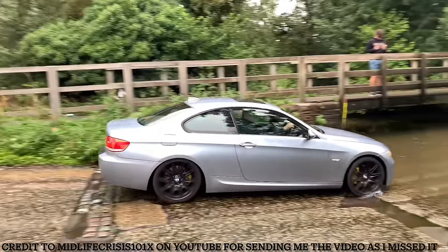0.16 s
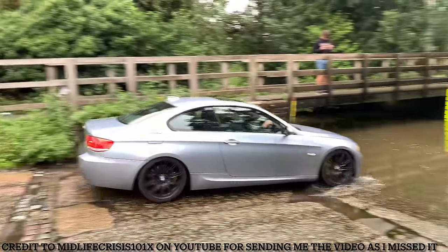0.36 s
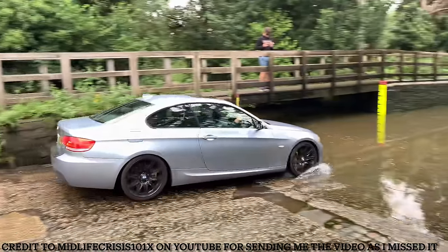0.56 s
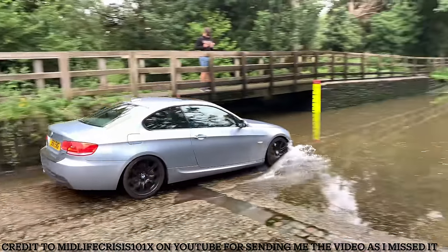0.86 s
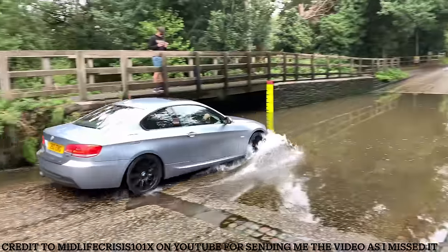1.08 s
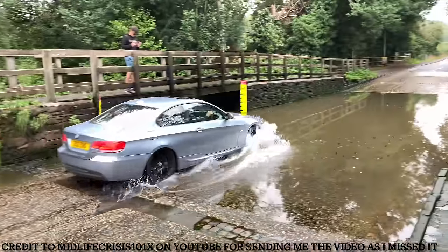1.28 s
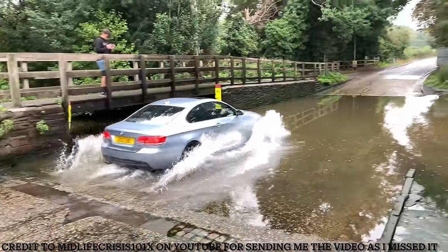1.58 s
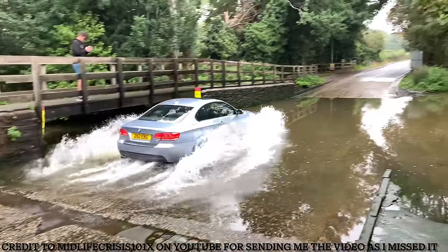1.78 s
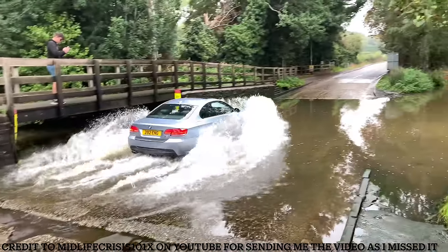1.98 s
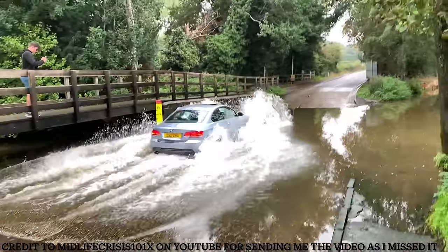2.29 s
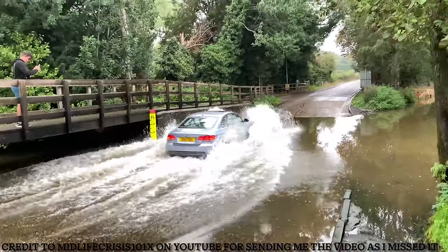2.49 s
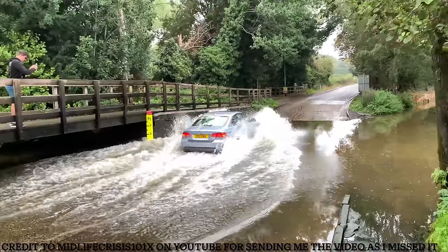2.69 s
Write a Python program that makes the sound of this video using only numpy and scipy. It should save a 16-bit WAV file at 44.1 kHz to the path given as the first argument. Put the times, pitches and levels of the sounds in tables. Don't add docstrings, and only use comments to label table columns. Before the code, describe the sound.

A car drives into a flooded ford. At 0-0.7 s a low engine mutters quietly, with crisp, hollow tyre slaps near 0.13 and 0.43 s and a thin watery hiss. From 0.8 s the splash grows; hard slaps hit at 1.1 and 1.4 s. Rushing spray, gurgling churn and thudding booms then fill the rest, deepest from 2.3 s, still roaring at the end as engine revs rise underneath.

```python
import sys
import numpy as np
from scipy import signal
from scipy.fft import rfft, irfft, next_fast_len
from scipy.io import wavfile
from scipy.ndimage import uniform_filter1d, map_coordinates

SR = 44100
rng = np.random.default_rng(int(sys.argv[2]) if len(sys.argv) > 2 else 0)


def invert_db(x):
    u = np.asarray(x, float) / 20
    return 10 ** u


def int16_out(signal):
    q = np.round(np.clip(np.atleast_2d(signal).T, -1, 1) * 32767)
    wavfile.write(sys.argv[1], SR, q.astype(np.int16))


N = 125685


def unit(x):
    return x / np.sqrt(np.mean(x ** 2) + 1e-20)


def along(points, hz):
    f, value = np.transpose(points)
    return np.interp(np.log(hz + 1), np.log(f + 1), value)


def curves(rows):
    s, *columns = np.transpose(rows)
    return [np.interp(np.arange(N) / SR, s, column) for column in columns]


def wobble(rate_hz):
    return map_coordinates(rng.standard_normal(200), [np.arange(N) * min(rate_hz, 60) / SR])


def filtered(x, response):
    size = next_fast_len(N + 8192)
    return irfft(rfft(x, size) * response(np.fft.rfftfreq(size, 1 / SR)), size)[..., :N]


def evened(x, span_s):
    power = np.abs(uniform_filter1d((x ** 2).mean(0), round(span_s * SR)))
    return x / np.sqrt(power + 1e-3)


# f/Hz, correlation
PORT_LIKENESS = [(60, .997), (200, .985), (500, .76), (1400, .6), (2500, .34), (6500, .24), (8600, .42),
                 (9700, .92), (11500, .96)]


def spread(pair):
    def mid_side(hz):
        angle = np.arccos(np.clip(along(PORT_LIKENESS, hz), 0, 1)) / 2
        return np.array([np.cos(angle), np.sin(angle)])
    mid, side = filtered(pair, mid_side)
    return np.array([mid + side, mid - side])


def rush(spectrum, patchy_db):
    z = signal.stft(rng.standard_normal((2, N)), nperseg=512)[2]
    patches = uniform_filter1d(rng.standard_normal(z.shape[1:]), 8, 0)
    patches = uniform_filter1d(patches, 8, 1)
    pair = signal.istft(z * invert_db(patchy_db * unit(patches)), nperseg=512)[1][:, :N]
    return unit(filtered(pair, lambda hz: invert_db(along(spectrum, hz))))


def bubbles(pitch_hz, octaves, cycles, scatter_db, rise, count, size):
    draw = rng.random((count, 3))
    start = (draw[:, 0] * N).astype(int)
    hz = (pitch_hz * np.ones(N))[start] * 2 ** (octaves * rng.standard_normal(count))
    u = np.arange(size) / SR * np.clip(hz, 62, 16000)[:, None]
    wave = np.sin(2 * np.pi * u * (1 + rise * u / cycles))
    wave *= np.exp(-u / cycles) * (1 - np.exp(-2 * u))
    wave *= invert_db(-scatter_db * np.log(draw[:, 1] + 0.02))[:, None]
    wave *= np.cos(np.linspace(0, np.pi / 2, size))
    at = start[:, None] + np.arange(size) + (draw[:, 2:] < .5) * (N + size)
    streams = np.bincount(at.ravel(), wave.ravel(), 2 * (N + size)).reshape(2, -1)
    return unit(streams[:, :N])


# t/s, level/dB, air pocket f/Hz
BOOM = [(0, -34.5, 146), (.2, -37.5, 140), (.4, -34.5, 129), (.55, -37.5, 152.6), (.75, -34.5, 183),
        (.9, -32.5, 200), (1.05, -32, 183), (1.17, -26, 204.5), (1.3, -29, 199), (1.5, -26, 189.4),
        (1.7, -23, 191), (1.9, -24.5, 176), (2.0, -26.5, 161), (2.15, -26, 155), (2.32, -19, 152),
        (2.45, -21, 116), (2.65, -23, 103), (2.85, -27.5, 100)]
# f/Hz, density/dB per Hz
ROAR_SPECTRUM = [(15, -47), (25, -5), (59, 8), (130, -2.5), (178, -1), (260, 2.5), (296, -14), (400, -8.5),
                 (520, -8), (880, -120)]


def boom():
    db, hz = curves(BOOM)
    pockets = bubbles(hz, octaves=0.443, cycles=1.74, scatter_db=0.5, rise=0.031, count=1400, size=1800)
    roar = rush(ROAR_SPECTRUM, patchy_db=1.45) * invert_db(0.69 * wobble(14))
    roar_db = -3.5 + 3 * np.log2(150 / hz)
    return invert_db(db - 0.2) * evened(pockets + invert_db(roar_db) * roar, span_s=0.036)


# t/s, peak level/dB, f/Hz
BIG_POCKETS = [(0.777, -25, 142), (0.822, -21.5, 205), (0.87, -26, 184), (0.894, -20, 183),
               (0.981, -20, 153), (1.051, -20.5, 155), (1.098, -14.5, 150), (1.129, -19.5, 130),
               (1.167, -13.5, 201), (1.278, -17.5, 114), (1.539, -13.5, 157), (1.601, -13.5, 179),
               (1.622, -16.5, 220), (1.697, -11, 148), (1.748, -20, 276), (1.857, -17, 161),
               (1.899, -17.5, 149.8), (1.938, -16.5, 152.9), (2.051, -17.5, 177), (2.08, -11.5, 178),
               (2.101, -16, 131), (2.15, -12.5, 153), (2.179, -12.5, 144), (2.318, -11, 129),
               (2.342, -14, 114.2), (2.37, -11.5, 87.9), (2.513, -8.5, 103), (2.546, -11, 102.5),
               (2.649, -10, 99.3), (2.694, -12, 94.9), (2.817, -14.5, 93)]


def thuds():
    out, t = np.zeros(N + SR), np.arange(SR // 5) / SR
    for s, db, hz in BIG_POCKETS:
        u = hz * t
        swell = np.exp(-u / 1.35) * (1 - np.exp(-u / 0.77))
        out[round(s * SR):][:len(t)] += invert_db(db) * np.sin(2 * np.pi * u) * swell * 2
    return out[:N]


# t/s, level/dB
CHURN = [(0, -37.5), (.15, -39.5), (.3, -42), (.42, -41.5), (.6, -42), (.8, -36), (1.0, -32.5), (1.13, -29),
         (1.25, -30.5), (1.4, -29.5), (1.55, -28), (1.75, -30), (2.0, -28.5), (2.2, -29.5), (2.33, -28.5),
         (2.5, -31.5), (2.65, -31.5), (2.85, -31)]
# f/Hz, density/dB per Hz
GUSH_SPECTRUM = [(160, -10), (280, -6.5), (840, -10), (1190, -10.5), (1720, -12.5), (2250, -14.5),
                 (3500, -31), (4550, -40), (7700, -120)]


def churn():
    db, = curves(CHURN)
    gush = evened(rush(GUSH_SPECTRUM, patchy_db=1.2), span_s=0.044)
    gush = gush * invert_db(0.44 * wobble(11.2) + 0.84 * wobble(22.19))
    gurgle = bubbles(899, octaves=0.802, cycles=4.1, scatter_db=3, rise=0.095, count=3000, size=400)
    return invert_db(db) * (invert_db(2.0) * gush + invert_db(-8.5) * gurgle)


# t/s, level/dB
SPRAY = [(0, -48), (.15, -46), (.25, -50), (.42, -47.5), (.47, -46), (.7, -44), (.93, -41), (1.0, -37.5),
         (1.07, -40), (1.11, -34), (1.2, -35), (1.45, -34), (1.7, -36.5), (1.9, -35), (2.2, -32.5),
         (2.45, -35.5), (2.65, -35.5), (2.85, -36.5)]
# f/Hz, density/dB per Hz
FIZZ_SPECTRUM = [(1300, -17), (2200, -2.5), (4000, 1.5), (6500, -3.5), (9000, 1), (11500, -2), (14000, -3),
                 (15800, -8.5)]


def spray():
    db, = curves(SPRAY)
    hiss = rush(FIZZ_SPECTRUM, patchy_db=1.08) * invert_db(0.3 * wobble(7.62) + 0.52 * wobble(16))
    drops = bubbles(5300, octaves=0.58, cycles=0.87, scatter_db=2.5, rise=0.046, count=12000, size=64)
    return invert_db(db) * (invert_db(3.5) * hiss + invert_db(-3.5) * drops)


# f/Hz, density/dB per Hz
SHEET_SPECTRUM = [(700, -24), (1400, 3), (1900, 5), (2500, -4.5), (3300, -1), (4200, -5.5), (5000, -9),
                  (8000, -27)]


def sheet():
    start_s, rise_s, fall_s, level_db = 0.28, 0.37, 1, -33
    t = np.clip(np.arange(N) / SR - start_s, 0, None)
    peel = (1 - np.exp(-t / rise_s)) * np.exp(-(t / fall_s) ** 2)
    return invert_db(level_db + 0.75 * wobble(12.3)) * peel * rush(SHEET_SPECTRUM, patchy_db=1.5)


# t/s, peak level/dB, f/Hz, left-right/dB
PINGS = [(0.022, -28.5, 1200, -7), (0.125, -27, 1040, -4), (.129, -22, 2130, 1), (.135, -24.5, 1114, -4),
         (.135, -28, 2950, 0), (.184, -29, 1770, -5), (.218, -25.5, 990, -6), (.219, -32, 1920, -11),
         (.430, -19, 1720, -2), (0.43, -29, 850, -9), (.436, -19.5, 845, -4), (.435, -25.5, 630, -7),
         (.438, -34.5, 3900, -3), (.131, -30, 3260, -8), (.219, -31, 610, -6), (.436, -26, 1210, -2),
         (.436, -23.5, 1970, -9), (.442, -22.5, 1750, -6), (.533, -25.5, 991, -4), (.532, -30, 2750, 1.5),
         (.536, -30, 1800, 1.5), (0.678, -26, 1940, 6), (0.825, -31, 920, -2), (.839, -26, 1000, -2),
         (.966, -25, 990, 2), (1.048, -23.5, 916, .2), (1.11, -19, 882, 3), (1.134, -20, 1600, -4),
         (1.183, -20.5, 810, 3), (1.423, -20.5, 779, 5), (1.424, -21.5, 1560, -4), (1.66, -27, 2000, .2),
         (1.818, -21.5, 1050, .2), (2.041, -24, 990, 3), (2.128, -24, 855, .2), (2.159, -22, 2270, .2),
         (2.627, -24, 791.5, .2), (2.8, -24, 895, .2), (2.825, -32, 992, .2)]
# t/s, peak level/dB
SPITS = [
    (.024, -39),
    (.13, -25),
    (.183, -36),
    (.218, -34),
    (.434, -20),
    (.532, -34),
    (.827, -33),
    (1.107, -21),
    (1.183, -29),
    (1.424, -16),
]
# f/Hz, density/dB per Hz
SPIT_SPECTRUM = [(500, -21), (2000, 11), (6000, -1), (15000, 1.5)]


def slaps():
    ring, hiss = np.zeros((2, N + SR)), np.zeros((2, N + SR))
    t = np.arange(SR // 12) / SR
    for s, db, hz, pan_db in PINGS:
        ping = invert_db(-60 * t / .014) * (1 - np.exp(-t / .0004)) * np.sin(2 * np.pi * hz * t) * 2
        crack = uniform_filter1d(rng.standard_normal(len(t)), size=5)
        ping = ping + invert_db(-6.5 - 60 * t / 0.0064) * crack
        sides = invert_db(db + pan_db / 2 * np.array([[1], [-1]]))
        ring[:, round(s * SR):][:, :len(t)] += sides * ping
    span_s, t60_s, hiss_db = .008, 0.061, -3.5
    for s, db in SPITS:
        swell = invert_db(hiss_db - 60 * t / t60_s) * (1 - np.exp(-2 * t / span_s))
        spit = rng.standard_normal((2, len(t))) * swell
        hiss[:, round((s - span_s / 2) * SR):][:, :len(t)] += invert_db(db) * spit
    return ring[:, :N] + spread(filtered(hiss[:, :N], lambda hz: invert_db(along(SPIT_SPECTRUM, hz))))


# t/s, exhaust firing f/Hz, level/dB
ENGINE = [
    (0, 63.58, -38.5),
    (.19, 64.33, -36),
    (.27, 77.1, -37.5),
    (.36, 78.84, -46),
    (.44, 70.47, -37.5),
    (.62, 71.34, -35),
    (.7, 64.2, -37.5),
    (.82, 65.03, -34.5),
    (1.1, 74.57, -45),
    (2.85, 96.9, -27),
]
# f/Hz, width/Hz, level/dB
PIPE = [(79.5, 41, -2.5), (140, 50, -2), (205, 49, -7), (285, 104, -10), (450, 170, -18)]
# multiple of the firing rate, level/dB
HUM = [(1, -1), (2, -7.5), (3, -13)]


def pipe(f):
    total = 0
    for i, (centre, width, db) in enumerate(PIPE):
        damping = 1j * f * width
        total = total + (-1) ** i * invert_db(db) * damping / (centre * centre - f * f + damping)
    return total


def engine():
    cylinder_db, scatter_db, jitter = [1.5, -1.5, -.5], 2, .06
    hz, db = curves(ENGINE)
    draw = rng.standard_normal((400, 2))
    k = np.arange(len(draw))
    at = np.interp(k + jitter * draw[:, 0], np.cumsum(hz) / SR, np.arange(N), right=N).astype(int)
    size_db = np.array(cylinder_db)[k % 3] + scatter_db * draw[:, 1]
    pulses = np.bincount(at, invert_db(size_db), N + 1)[:N] / np.sqrt(hz)
    exhaust = unit(filtered(pulses, lambda f: pipe(f) / (1 + (f / 600) ** 2)))
    turns = np.cumsum(hz * (1 + 0.028 * wobble(11.56))) / SR
    hum = sum(invert_db(g + 1.7 * wobble(8.3)) * np.sin(2 * np.pi * order * turns) for order, g in HUM)
    return invert_db(db) * (invert_db(-2.0) * exhaust + hum)


# f/Hz, left-right/dB
LEAN = [(60, -1.6), (270, -0.7), (1220, -0.8), (3300, 1.2), (5500, -0.7), (9000, -2.5), (15000, 1.7)]


def scene():
    water = spread(boom() + churn() + spray() + sheet())
    car = water + engine() + thuds()
    sides = np.array([[1], [-1]])
    return filtered(car, lambda hz: invert_db(along(LEAN, hz) / 2 * sides)) + slaps()


def low_pass(x):
    return signal.sosfilt(signal.butter(12, 15780, fs=SR, output="sos"), x)


# f/Hz, phase/turns
RIGHT_LEAD = [(700, 0), (1400, -.14), (1900, -.45), (2450, -.15), (3300, -.5), (4200, 0), (5300, .5),
              (7050, 1), (10150, 2), (11600, 2.46), (12200, 2.54), (13450, 3), (15000, 3.48), (15900, 3.62)]
# f/Hz, level/dB
PORT_COLOUR = [(1500, -0.55), (2570, 0.44), (3260, 1), (4030, 0), (5400, 0.5), (6200, 1.5), (8000, 0.52)]


def record(dry):
    def ports(hz):
        lead = np.interp(hz, *np.transpose(RIGHT_LEAD))
        phase = np.exp(1j * np.pi * lead * np.array([[-1], [1]]))
        low_cut = hz ** 4 / (hz ** 4 + 38 ** 4)
        return phase * invert_db(along(PORT_COLOUR, hz)) * (hz < 15850) * low_cut
    return low_pass(filtered(dry, ports))


dry = scene()
out = record(dry)
int16_out(out)
```